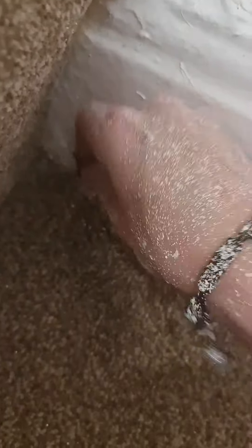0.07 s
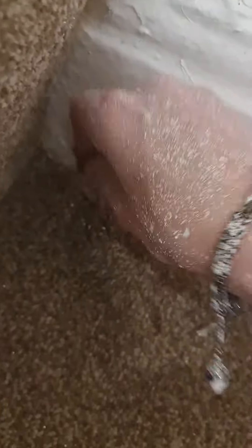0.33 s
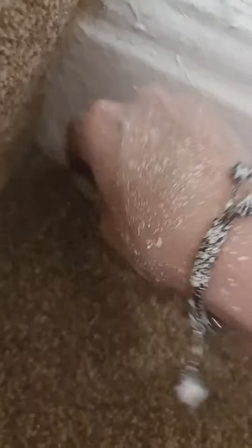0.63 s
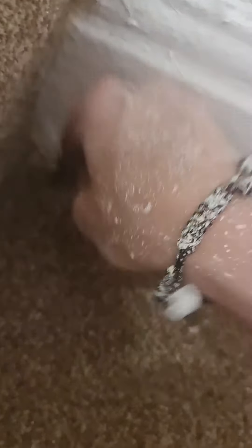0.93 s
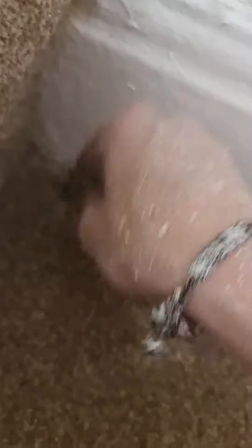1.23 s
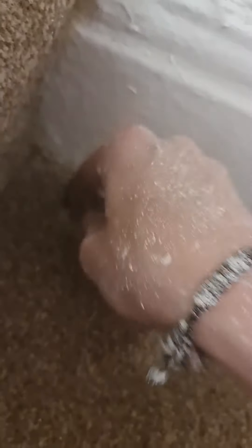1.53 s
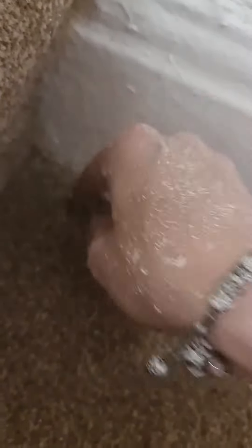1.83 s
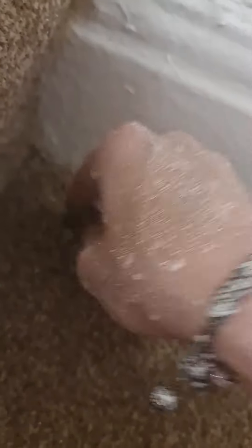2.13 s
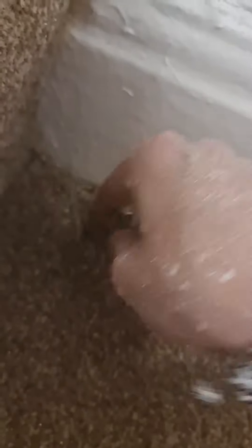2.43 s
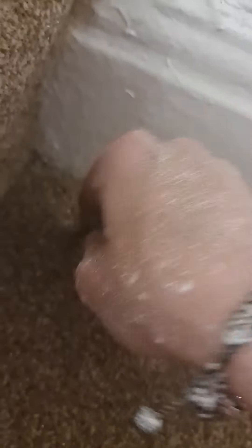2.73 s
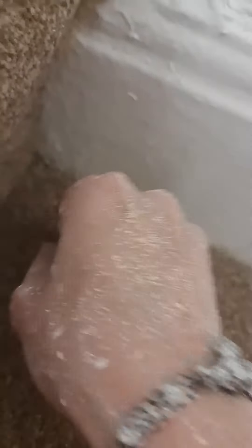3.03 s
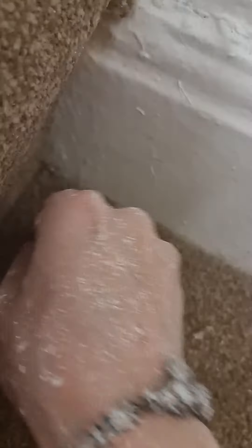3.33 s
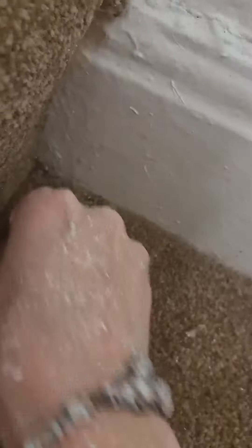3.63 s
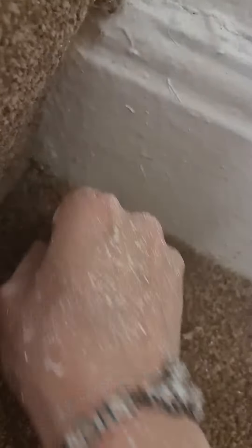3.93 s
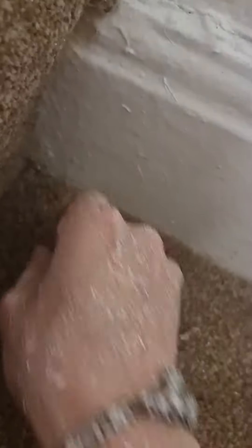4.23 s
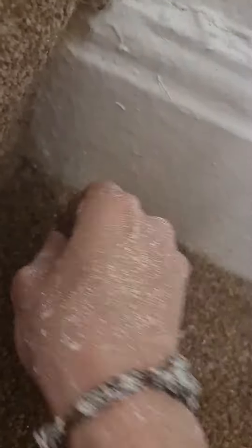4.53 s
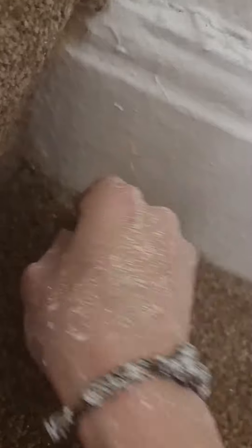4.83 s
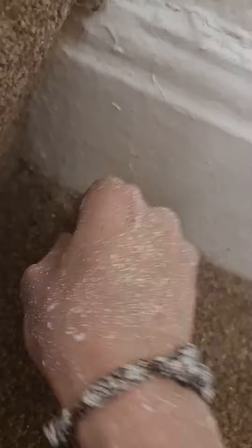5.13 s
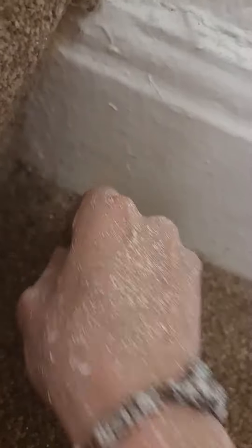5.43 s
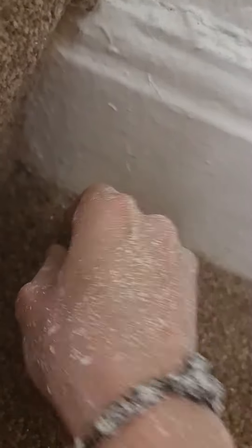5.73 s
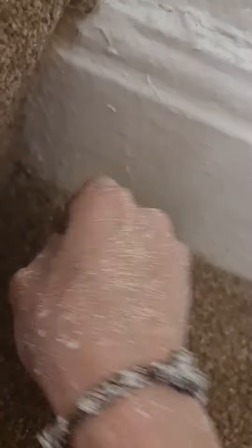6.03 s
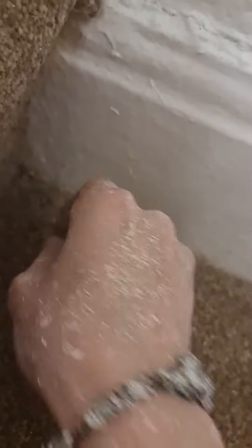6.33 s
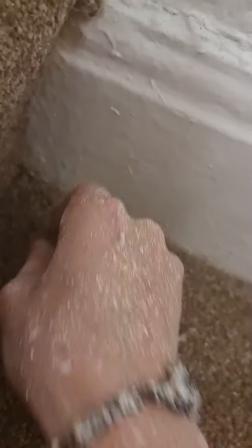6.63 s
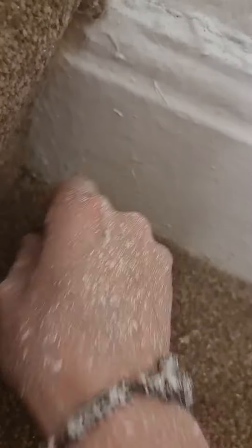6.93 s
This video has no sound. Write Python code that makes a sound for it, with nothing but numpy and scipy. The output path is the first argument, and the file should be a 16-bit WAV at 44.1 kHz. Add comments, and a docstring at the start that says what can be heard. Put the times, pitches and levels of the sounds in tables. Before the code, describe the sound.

A hand scrubs carpet in quick, scratchy strokes, repeatedly knocking against a wooden skirting board with soft floor thuds underneath.

```python
"""A small, quiet room, where a hand scrubs the carpet close to a pair of microphones.
About three strokes a second drag over the pile with a dull scrape and a hiss of flicking fibres.
The scrubber knocks against a wooden skirting board, which rings and rattles, and the floor thuds
as the arm bears down. A bracelet ticks now and then; the room rings briefly over a steady hush."""
import sys
import numpy as np
from scipy import signal
from scipy.fft import rfft, irfft
from scipy.io import wavfile
from scipy.ndimage import uniform_filter1d, minimum_filter1d

SR = 44100
rng = np.random.default_rng(int(sys.argv[2]) if len(sys.argv) > 2 else 0)


def to_wav(sig):
    """Store sig (one row per channel, or 1-D mono) as 16-bit WAV at the path in sys.argv[1].

    Samples outside -1..1 are clipped; the rate is SR.
    """
    pcm = np.clip(np.atleast_2d(sig), -1, 1) * 32767
    pcm = np.round(pcm).astype(np.int16)
    wavfile.write(sys.argv[1], SR, pcm.T)  # frames by channels


N = 308259
HZ = np.fft.rfftfreq(N, 1 / SR)
TIME = np.arange(N) / SR


# drags over the pile: (start [s], length [s], relative scrape level [dB], relative hiss level [dB])
STROKES = [(0.0, 0.052, -49, -54.5), (0.204, .025, -60, -66), (0.262, 0.081, -49, -50.5),
           (0.569, .07, -58.5, -57), (0.675, .03, -68.5, -59.5), (0.839, 0.073, -53, -53),
           (1.094, 0.096, -47, -50.5), (1.381, 0.081, -46.5, -51.5), (1.645, 0.0903, -47.5, -51.5),
           (1.92, 0.097, -47, -51.5), (2.199, 0.1, -46, -50.5), (2.466, 0.11, -48, -51),
           (2.772, .09, -46.5, -52), (3.066, 0.09, -50, -51.5), (3.364, .092, -50, -54.5),
           (3.671, 0.11, -49.5, -54), (3.984, .095, -48, -55), (4.299, 0.1, -48, -54.5),
           (4.629, 0.08, -51, -57.5), (4.91, 0.092, -49, -53.5), (5.22, 0.081, -51, -55),
           (5.498, 0.1, -47.5, -51.5), (5.802, 0.1, -51, -54), (6.105, 0.09, -49.5, -53),
           (6.399, .098, -51, -52.5), (6.704, 0.1, -50.5, -52.5)]
# tone of the dull scrape and of the bright fibre hiss: (frequency [Hz], relative level [dB])
SCRAPE_EQ = [(30, -39), (70, 9), (130, 13.5), (160, -8.5), (225, 9.5), (390, -3.5), (560, 5), (720, -0.5),
             (820, 1.5), (1400, -10), (2150, -8), (2600, -22), (5000, -31), (9000, -55)]
FIBRE_EQ = [(500, -20), (2050, 3), (2600, -3), (3300, 2), (4200, 1), (5500, -1.5), (7000, -11),
            (7700, -24.5), (8300, -16), (9500, -18.5), (11500, -7), (15000, -13), (17000, -19)]


def scrubbing(scrape_db=5.5, hiss_db=-2, tuft_db=2, tuft_s=0.0062):
    """Each stroke drags over the pile: a dull scrape and a fine hiss, both lumpy from the tufts."""
    scrape_env, hiss_env = sum(stroke_envelopes(*stroke) for stroke in STROKES)
    tufts = amp(tuft_db * unit(uniform_filter1d(rng.standard_normal(N), int(tuft_s * SR))))
    scrape = amp(scrape_db) * scrape_env * coloured(crackle(per_s=4000, spread_db=1.5), SCRAPE_EQ)
    hiss = amp(hiss_db) * hiss_env * coloured(crackle(per_s=6700, spread_db=3.5), FIBRE_EQ)
    return catching_tufts(tufts * (scrape + hiss)) + fibre_zing(hiss_env)


def stroke_envelopes(start, length, scrape_db, hiss_db, attack_s=0.0082, release_s=0.012,
                     scuff_lead_s=0.039, scuff_s=0.0089):
    """The fibres scuff as the hand turns; then the stroke bites, is loudest halfway and stops."""
    t = TIME - start
    slowness = (2 * np.clip(t / length, 0, 1) - 1) ** 2
    gate = np.exp(np.minimum(t, 0) / attack_s - np.maximum(t - length, 0) / release_s)
    scuff = amp(hiss_db - 17) * np.exp(-abs(t + scuff_lead_s) / scuff_s)
    scrape = gate * amp(scrape_db - 4.5 * slowness)
    hiss = gate * amp(hiss_db - 8 * slowness)  # follows the speed more than the scrape does
    return np.array([scrape, hiss + scuff])


def catching_tufts(rasp, depth_db=3, patch_hz=700, patch_s=0.03):
    """Different tufts catch from moment to moment, so narrow bands of the rasp come and go."""
    bands = signal.stft(rasp, SR, nperseg=512)[2]
    patches = rng.standard_normal(bands.shape[1:])
    patches = uniform_filter1d(patches, round(patch_hz * 512 / SR), axis=0)
    patches = uniform_filter1d(patches, round(patch_s * SR / 256), axis=1)
    gain = unit(amp(depth_db * unit(patches)))
    return signal.istft(bands * gain, SR, nperseg=512)[1][:, :N]


def fibre_zing(hiss_env, level_db=-10, rest_hz=4190, rise_hz=1160, width_hz=660, linger_s=0.018):
    """Bent fibres spring back with a thin ring that falls as the stroke slows and outlasts the hiss."""
    linger = np.exp(-1 / (linger_s * SR))
    envelope = signal.lfilter([1 - linger], [1, -linger], hiss_env)
    speed = sum(np.sin(np.pi * np.clip((TIME - start) / length, 0, 1)) for start, length, _, _ in STROKES)
    sweep = np.exp(2j * np.pi * np.cumsum(rest_hz + rise_hz * speed) / SR)
    pole = np.exp(-np.pi * width_hz / SR)
    flicks = crackle(per_s=2200, spread_db=7.5)
    ring = sweep * signal.lfilter([1], np.poly([pole, pole]), flicks / sweep)  # swept band-pass
    return amp(level_db) * envelope * unit(ring.real)


# the scrubber hits the skirting board, and at 1.05 s the hand lands softly: (time [s], relative force [dB],
# hardness [dB], # relative snap level [dB], gap to first rebound [s], rebound against the blow [dB])
KNOCKS = [(0.4655, -19.5, 2, -50.5, 0.0065, 0), (0.7193, -5.5, -2.5, -36.5, 0.028, -13),
          (0.758, -15, -3.5, -60, 0.013, -21.5), (1.0491, -39, -15, -68, 0.012, -9),
          (2.686, -20.5, -18.5, -65.5, .01, -16), (2.9694, -0.85, -4, -34.5, 0.021, -13),
          (3.2665, 0, -8.5, -47, 0.0098, -2), (3.5784, 1.1, -12, -53, .0095, -4.5),
          (3.8973, -2.5, 8, -61.5, 0.0094, -22), (4.2002, -1, 3, -48.5, 0.01, -15),
          (4.4994, 2.5, -1, -47, 0.0059, -35), (4.8035, -1.6, -4, -50.5, 0.015, -3),
          (5.1078, -0.9, 2.5, -49, .0046, -14.5), (5.4144, -15.5, -5.5, -70, 0.0085, -25.5),
          (5.7195, -10, -1, -78, 0.0097, -22), (6.0046, -2.8, 8.5, -44, 0.009, -24),
          (6.3131, -8.5, -2.5, -51.5, 0.0062, -5), (6.6196, -5, 0.5, -52.5, .0058, -17)]


def contacts(rebounds=2, softer_db=11.5, gap_ratio=0.62, loss_db=12):
    """Each blow and its softer, quickening rebounds: (time [s], force [dB], hardness [dB], snap [dB])."""
    hits = []
    for s, force_db, hard_db, snap_db, gap_s, rebound_db in KNOCKS:
        hits.append((s, force_db, hard_db, snap_db))
        for k in range(rebounds):
            s += gap_s * gap_ratio ** k
            bounce_db = rebound_db - k * loss_db
            hits.append((s, force_db + bounce_db, hard_db - softer_db, snap_db + bounce_db))
    return hits


# the board's short woody ring, plus a few long, steady room tones that each knock sets off:
# (frequency [Hz], relative level [dB], t60 [s], polarity [+/-1])
KNOCK_MODES = [(227, -28.5, 0.5, -1), (261.2, -9, 0.056, -1), (464, -2, 0.016, -1), (642, -37, 0.18, 1),
               (669.4, 3, 0.027, 1), (723, -32, .42, 1), (832, -18.5, 0.036, 1), (1080, -5.5, 0.016, 1),
               (1326, -16.5, 0.018, 1), (1572, -10, 0.012, 1), (1878, -13.5, 0.01, 1),
               (2200, -30, 0.007, 1), (2620, -27, 0.036, 1), (3755, -26, 0.011, 1)]


def board_knocks(level_db=-0.5, detune=0.022, pivot_hz=633, hard_slope=0.51, attack_s=0.0002):
    """Every contact rings the board and a few room tones; a harder one favours the high modes."""
    out, t = np.zeros(N), np.arange(SR // 3) / SR
    hz, mode_db, t60, polarity = np.transpose(KNOCK_MODES)[:, :, None]
    attack = 1 - np.exp(-t / attack_s)
    for s, force_db, hard_db, _ in contacts():
        tilt_db = hard_slope * hard_db * np.clip(np.log2(hz / pivot_hz), 0, 2)
        # the board's modes shift from knock to knock; the room's tones keep their pitch
        ring_hz = hz * (1 + detune * rng.standard_normal(hz.shape) * (t60 < 0.1))
        modes = polarity * amp(mode_db + tilt_db - 60 * t / t60) * np.sin(2 * np.pi * ring_hz * t)
        add(out, s, amp(force_db + level_db) * attack * modes.sum(0))
    # a narrow board radiates little bass, and the padded contact little treble
    return signal.sosfilt(signal.butter(4, [216, 5400], "band", fs=SR, output="sos"), out)


# midrange rattle of the board against the wall: (frequency [Hz], relative level [dB])
CHATTER_EQ = [(300, -29), (700, 12), (1200, 8.5), (1700, 6), (2100, 3.5), (2750, 4.5), (3300, -8.5),
              (4200, -11.5), (5800, -18.5), (7500, -45), (16000, -38)]


def board_chatter(level_db=-29, decay_s=0.024, hard_slope=0.73):
    """A hard knock leaves the loose board rattling for a moment."""
    envelope, t = np.zeros(N), np.arange(SR // 6) / SR
    for s, force_db, hard_db, _ in contacts():
        add(envelope, s, amp(level_db + force_db + hard_slope * hard_db) * np.exp(-t / decay_s))
    return envelope * coloured(crackle(per_s=1500, spread_db=3), CHATTER_EQ)


# the crisp top of a contact: (frequency [Hz], relative level [dB])
SNAP_EQ = [(1000, -22), (4000, 9.5), (6500, -1), (8000, -11.5), (10000, -12), (12000, 1.5), (15000, -8),
           (17000, -19.5)]


def edge_snaps(level_db=10.5, rise_s=0.0022, decay_s=0.0038, peak_delay_s=0.00089):
    """The scrubber's edge crushes against the board at each contact: a brief, bright crunch."""
    envelope, t = np.zeros(N), np.arange(-SR // 80, SR // 20) / SR
    crunch = np.exp(np.minimum(t, 0) / rise_s - np.maximum(t, 0) / decay_s) / 2
    for s, _, _, snap_db in contacts():
        add(envelope, s + peak_delay_s + t[0], amp(snap_db + level_db) * crunch)
    return envelope * coloured(crackle(per_s=9000, spread_db=1.5), SNAP_EQ)


# the arm's weight lands as it turns or bears down: (time [s], relative level [dB])
THUDS = [(0.019, -39), (0.508, -33.5), (0.796, -27.5), (1.058, -22), (1.181, -34), (1.35, -34.5),
         (1.434, -38), (1.62, -41), (1.686, -29), (1.895, -33.5), (1.994, -30), (2.175, -29.5),
         (2.244, -28), (2.44, -31), (2.536, -28.5), (2.746, -29.5), (2.78, -32.5), (3.027, -28.5),
         (3.083, -28.5), (3.128, -24.5), (3.319, -24.5), (3.396, -30), (3.632, -32), (3.699, -29),
         (3.741, -26), (3.942, -37), (4.012, -35), (4.256, -35.5), (4.318, -29), (4.563, -23.5),
         (4.86, -39), (5.162, -28), (5.451, -25), (5.586, -32.5), (5.763, -25), (6.057, -24),
         (6.358, -22.5), (6.469, -29), (6.671, -30), (6.972, -36.5)]
# the floor's boom: (frequency [Hz], relative level [dB], t60 [s])
FLOOR_MODES = [(72.9, -14, 0.32), (111, -15, 0.32)]


def floor_thuds(thud_hz=93.9, rise_s=0.012, low_cut_hz=40.5):
    """The padded floor gives under the arm: about two low cycles, then a faint boom."""
    out, t = np.zeros(N), np.arange(SR // 2) / SR
    swell = (t / rise_s * np.exp(1 - t / rise_s)) ** 4
    punch = swell * np.sin(2 * np.pi * thud_hz * (t - rise_s))
    boom = sum(amp(db - 60 * t / t60) * np.sin(2 * np.pi * hz * t) for hz, db, t60 in FLOOR_MODES)
    thud = punch + boom * (1 - np.exp(-t / rise_s))
    # somewhere in each stroke the scrubber catches and nudges the floor
    judders = [(start + rng.random() * length, scrape_db + 5) for start, length, scrape_db, _ in STROKES]
    for s, db in THUDS + judders:
        add(out, s - rise_s, amp(db) * thud)
    return irfft(rfft(out) * HZ ** 4 / (HZ ** 4 + low_cut_hz ** 4), N)


# bead against bead: (time [s], relative level [dB], ring frequency [Hz])
BEAD_TICKS = [(0.139, -53, 4350), (0.315, -40.5, 7100), (1.326, -45, 4300), (2.067, -53, 4800),
              (2.3454, -45, 5000), (2.4264, -43, 5330), (2.5875, -45, 5250), (2.8952, -39, 13600),
              (3.4492, -45.5, 3760), (3.9494, -33, 3070), (4.1125, -40, 5910), (5.1612, -40, 3340),
              (5.206, -41.5, 3560), (5.4372, -42.5, 5550), (5.754, -39.5, 5300)]


def bracelet_ticks(level_db=-8, decay_s=0.0026, grit_db=-9, width_hz=700):
    """Bracelet beads touch: a broad, quickly damped ring with a gritty edge."""
    out, t = np.zeros(N), np.arange(SR // 25) / SR
    hz = np.fft.rfftfreq(len(t), 1 / SR)
    grit = amp(grit_db + curve(FIBRE_EQ, hz))
    for s, db, ring_hz in BEAD_TICKS:
        resonance = 1 / (1 + (2 * (hz - ring_hz) / width_hz) ** 2)
        ring = unit(irfft(rfft(rng.standard_normal(len(t))) * (resonance + grit), len(t)))
        add(out, s, amp(db + level_db) * np.exp(-t / decay_s) * ring)
    return out


def bracelet_jiggle(level_db=-49.5, force_slope=0.4, wait_s=(0.01, 0.12), decay_s=0.001):
    """Every knock jolts the bracelet: a faint click follows it."""
    envelope, t = np.zeros(N), np.arange(SR // 80) / SR
    for s, force_db, _, _ in contacts():
        click_s = s + rng.uniform(*wait_s)
        click_db = level_db + force_slope * force_db - rng.random()
        add(envelope, click_s, amp(click_db) * np.exp(-t / decay_s))
    return envelope * coloured(rng.standard_normal((2, N)), SNAP_EQ)


# reflections off the nearest surfaces: (delay [s], level against the direct sound [dB])
CORNER_TAPS = [(.0007, -36.5), (.0016, -21.5), (.0029, -24)]


def corner_comb(rasp):
    """Board and wall are a hand's width away: their reflections carve fixed bands into the rasp."""
    comb = 1 + sum(amp(db) * np.exp(-2j * np.pi * HZ * s) for s, db in CORNER_TAPS)
    return irfft(rfft(rasp) * comb / np.sqrt(np.mean(abs(comb) ** 2)), N)


# tone of the reverb: (frequency [Hz], relative level [dB])
ROOM_EQ = [(60, 11), (125, -1), (165, -5.5), (230, 12.5), (330, 5.5), (600, -8), (740, -2.5), (930, -9.5),
           (1200, 1), (2000, -2), (3300, -0.5), (4500, 4), (7500, 2.5), (15000, -2)]
# length of its tail: (frequency [Hz], t60 [s])
ROOM_DECAY = [(80, 0.63), (240, 0.88), (600, 0.37), (2000, 0.99), (5000, 0.5), (12000, 0.35)]
# stereo width of the reverb and the hush: alike in the bass, partly opposed in the mids: # (frequency [Hz],
# correlation [-1..1])
DIFFUSE_CORRELATION = [(150, .96), (260, 0.78), (430, -.3), (900, -.3), (2000, -.3), (3000, .1),
                       (6000, -0.42)]


def room_reverb(send, early_db=-15, early_t60=0.16, late_db=-19.5, predelay_s=0.0065):
    """Quick reflections from the corner, then a faint tail from the rest of the room."""
    hz, t, bands = signal.stft(rng.standard_normal((2, SR * 2 // 3)), SR, nperseg=256)
    bands = bands * amp(curve(ROOM_EQ, hz))[:, None]
    envelope = 0
    for db, t60 in ((early_db, early_t60), (late_db, curve(ROOM_DECAY, hz)[:, None])):
        energy = SR * t60 / np.log(1e6)
        envelope = envelope + amp(db - 60 * t / t60) / np.sqrt(energy)
    impulse = signal.istft(bands * envelope, SR, nperseg=256)[1]
    impulse = np.pad(impulse, ((0, 0), (int(predelay_s * SR), 0)))
    wet = signal.fftconvolve(send[None], impulse, axes=1)[:, :N]
    return irfft(stereo_spectra(wet, DIFFUSE_CORRELATION), N)


# bass-heavy background hush: (frequency [Hz], relative level [dB])
HUSH_EQ = [(25, -26), (50, -8.5), (65, 6), (115, 0), (160, -19.5), (230, -10), (400, -27), (550, -22),
           (1000, -23), (2500, -31), (4300, -29), (6000, -33.5), (8000, -53.5), (14000, -40.5)]


def room_hush(level_db=-59):
    """A steady, low hush arrives from all around."""
    return amp(level_db) * coloured(rng.standard_normal((2, N)), HUSH_EQ, DIFFUSE_CORRELATION)


# stereo placement of the board, and of the rubbing lower down: (frequency [Hz], left phase lead [rad])
BOARD_LEAD = [(50, -0.3), (130, 0.5), (200, 0), (330, 1), (410, 1.5), (650, 2), (800, 3.5), (1100, 1),
              (1400, 2), (2000, 2), (3000, 4), (4000, 7.5), (8000, 8.5), (16000, 36)]
RUB_LEAD = [(100, 0), (330, 0.5), (430, 1.5), (560, 1.5), (800, 2.5), (1200, 0), (1500, 1.5), (2000, 1),
            (2600, 2.5), (3300, 5), (4000, 7), (8000, 10), (16000, 31.5)]
# their panning: (frequency [Hz], left minus right [dB])
BOARD_PAN = [(100, -0.5), (260, -1.5), (380, -4.5), (500, 0.5), (660, -0.5), (850, 10.5), (1300, 1),
             (1700, 3.5), (2200, -6.5), (3500, 0), (6000, 11.5), (14000, 1.5)]
RUB_PAN = [(100, -2), (430, 2.5), (560, -6), (850, 8), (1100, 3), (1300, 3.5), (1700, 0.5), (2300, -3),
           (2900, 1), (4000, -4.5), (5500, 7), (7000, 11), (9000, 2), (14000, 2.5)]


def microphones(x, lead, pan):
    """Near sound reaches the left microphone first; the housing shades each side differently."""
    left = amp(curve(pan, HZ) / 2)
    right = np.exp(-1j * curve(lead, HZ)) / left
    return irfft(rfft(x) * np.array([left, right]), N)


# close sounds, mono in the bass and wide on top: (frequency [Hz], correlation [-1..1])
CLOSE_CORRELATION = [(150, 1), (700, 0.83), (2000, 0.71), (5000, 0.13), (14000, 0.18)]


def coloured(pair, eq, correlation=CLOSE_CORRELATION):
    """Gives two unrelated noises a tone and a stereo width, at rms 1."""
    return unit(irfft(stereo_spectra(pair, correlation) * amp(curve(eq, HZ)), N))


def stereo_spectra(pair, correlation):
    """Spectra of two unrelated signals, with the left blended into the right to set the width."""
    left, right = rfft(pair)
    shared = curve(correlation, HZ)
    return np.array([left, shared * left + np.sqrt(1 - shared ** 2) * right])


def crackle(per_s, spread_db):
    """Tiny contacts catch and let go: two channels of random clicks of uneven size."""
    size = amp(spread_db * np.minimum(rng.exponential(1, (2, N)), 4))
    return size * rng.standard_normal((2, N)) * (rng.random((2, N)) < per_s / SR)


def amp(db):
    """Decibels to gain."""
    return 10 ** (np.asarray(db) / 20)


def unit(x):
    """Scales to rms 1."""
    return x / np.sqrt(np.mean(x ** 2) + 1e-20)


def curve(points, hz):
    """Reads a table on a log-frequency axis."""
    point_hz, value = np.transpose(points)
    return np.interp(np.log(hz + 1), np.log(point_hz + 1), value)


def add(mix, s, sound):
    """Adds a sound to the mix at time s."""
    part = mix[max(round(s * SR), 0):][:len(sound)]
    part += sound[:len(part)]


def scene(close_send_db=-3.5, crossfade_cycle_s=2.6):
    """Board, carpet, bracelet and floor in the room, over its steady hush."""
    board = board_knocks() + board_chatter() + edge_snaps()
    close = corner_comb(scrubbing()) + bracelet_ticks() + bracelet_jiggle()
    floor = floor_thuds()
    direct = microphones(board, BOARD_LEAD, BOARD_PAN) + microphones(close + floor, RUB_LEAD, RUB_PAN)
    # the board radiates into the whole room; the hand shields the small sounds under it
    send = board[0] + floor + amp(close_send_db) * close[0]
    # the moving arm changes the reflections: a slow crossfade between two reverbs
    angle = 2 * np.pi * TIME / crossfade_cycle_s
    reverb = room_reverb(send * np.cos(angle)) + room_reverb(send * np.sin(angle))
    return direct + reverb + room_hush()


def record(dry, high_cut_hz=16300):
    """A fast limiter holds any peak to full scale; a steep low-pass trims the very top."""
    allowed_gain = 1 / np.maximum(abs(dry).max(0), 1)
    limited = dry * uniform_filter1d(minimum_filter1d(allowed_gain, size=65), size=65)
    low_pass = signal.firwin(511, high_cut_hz, window=("kaiser", 9), fs=SR)
    return signal.oaconvolve(limited, low_pass[None], "same")


dry = scene()
out = record(dry)
to_wav(out)
```